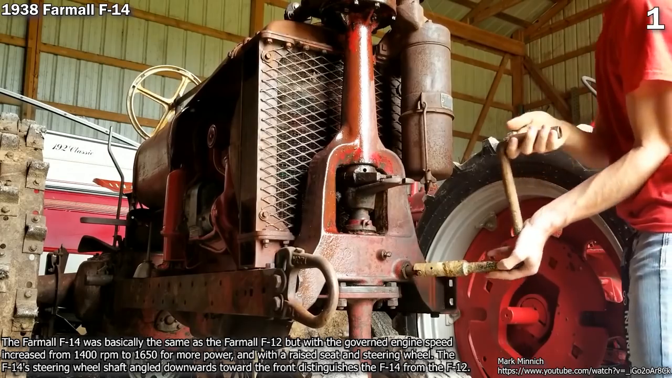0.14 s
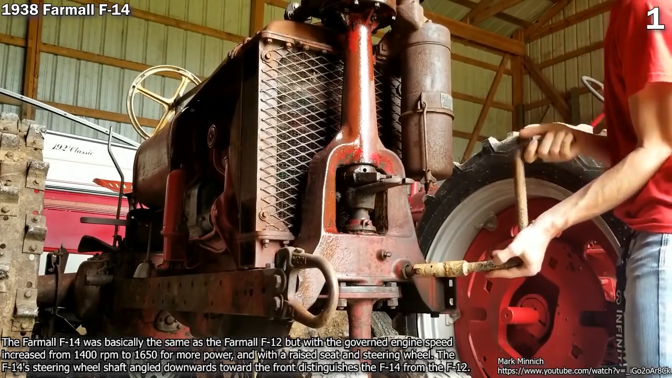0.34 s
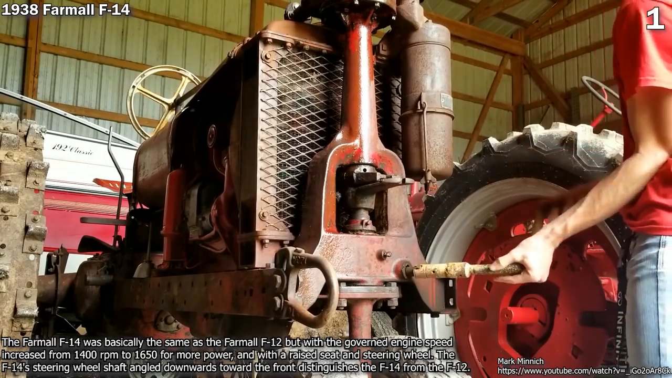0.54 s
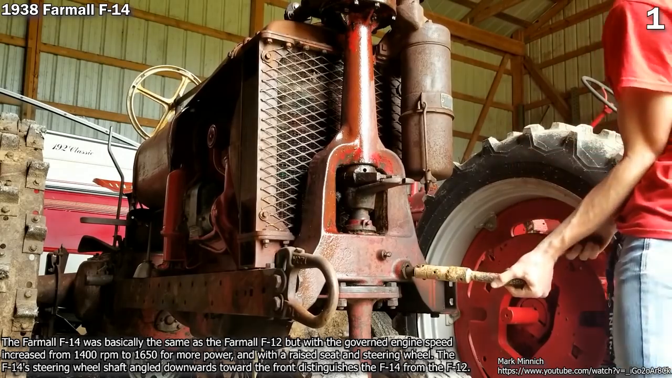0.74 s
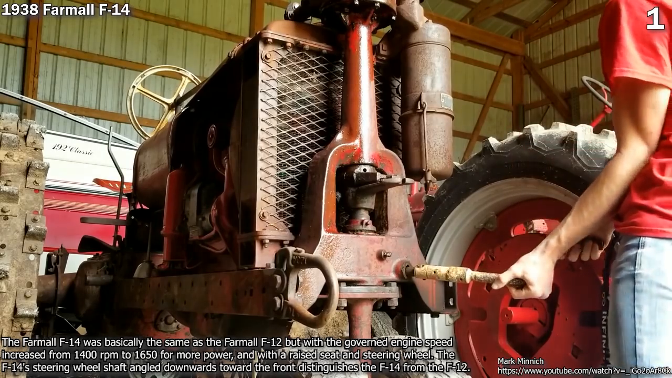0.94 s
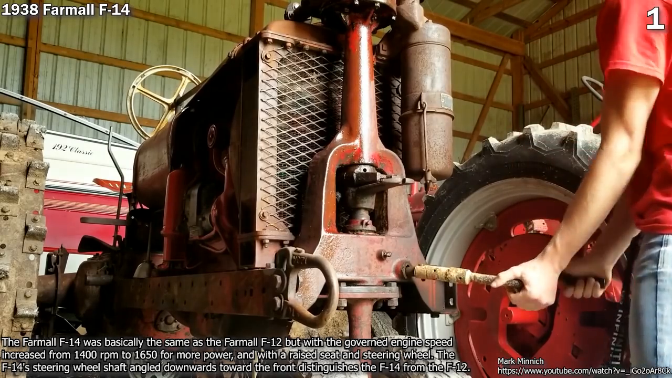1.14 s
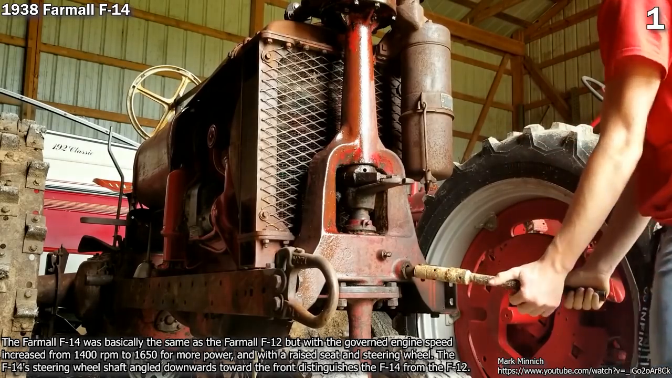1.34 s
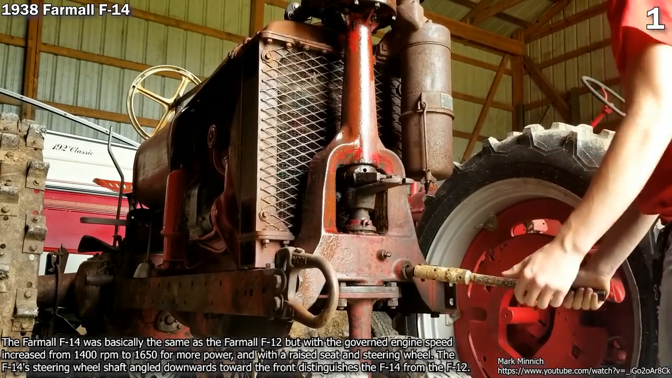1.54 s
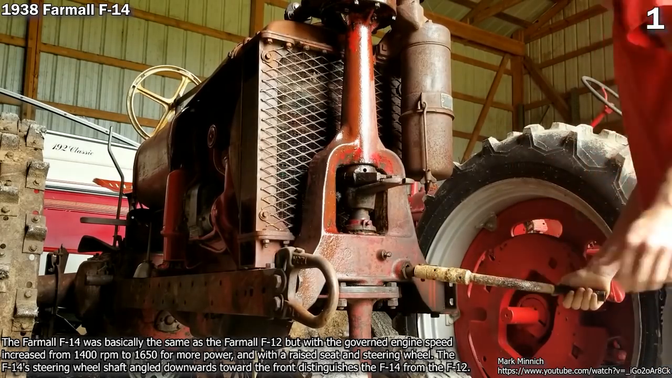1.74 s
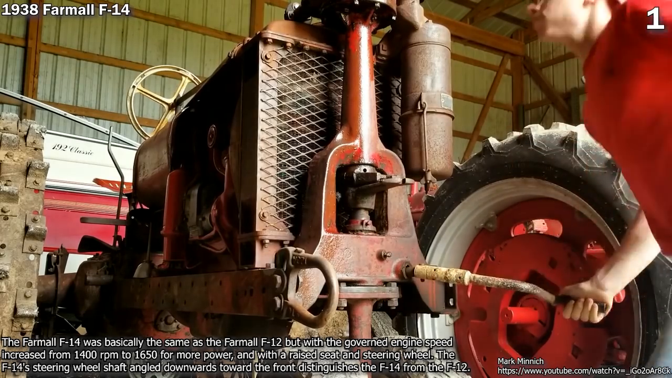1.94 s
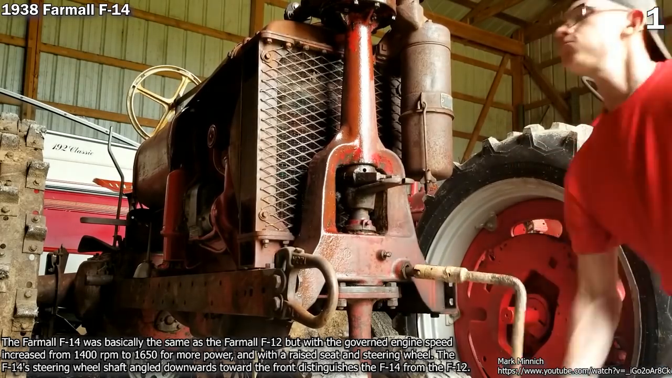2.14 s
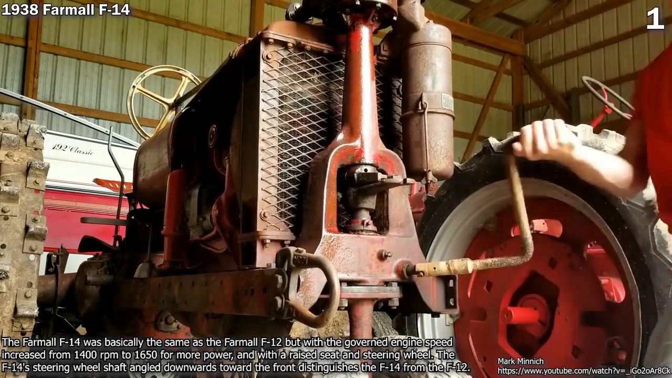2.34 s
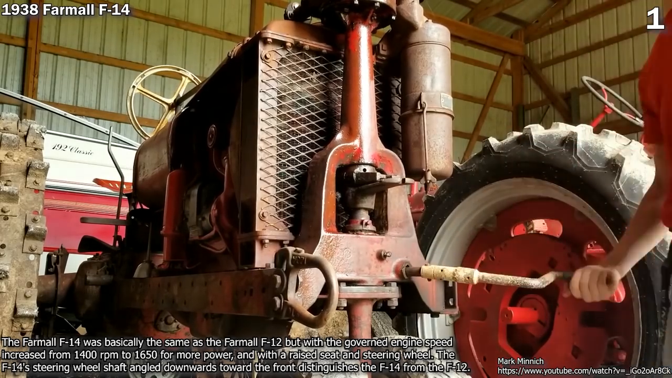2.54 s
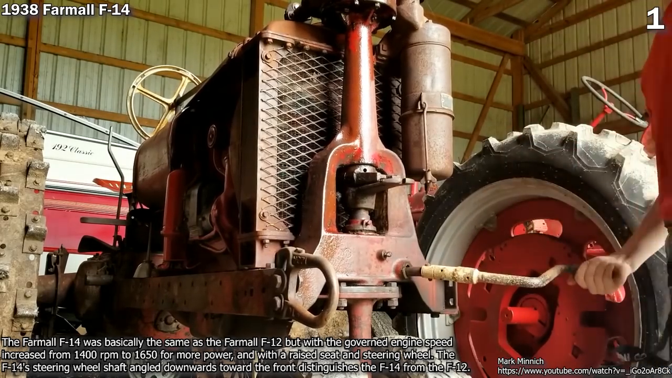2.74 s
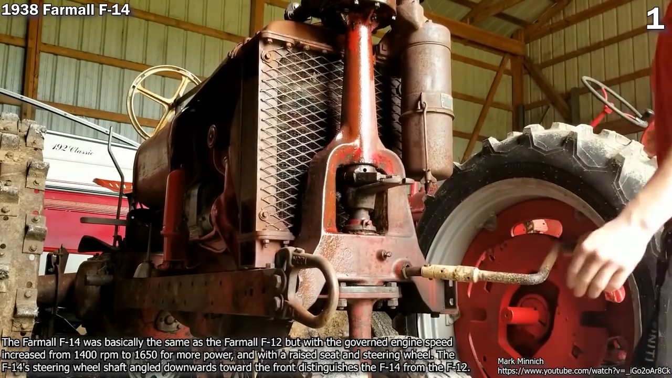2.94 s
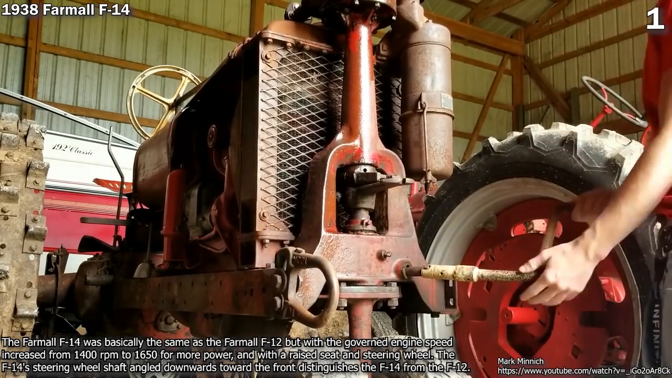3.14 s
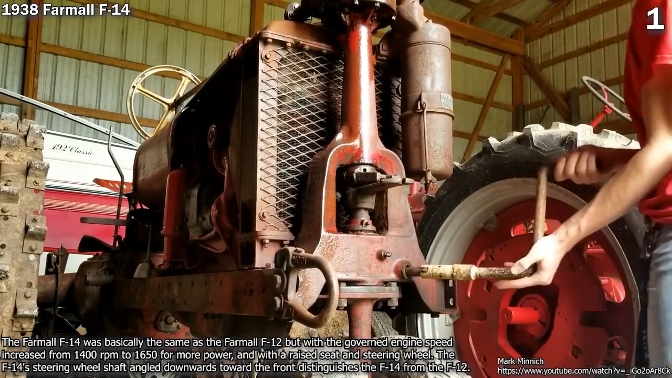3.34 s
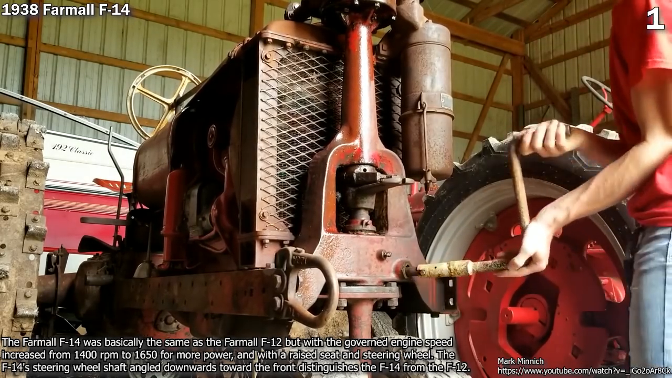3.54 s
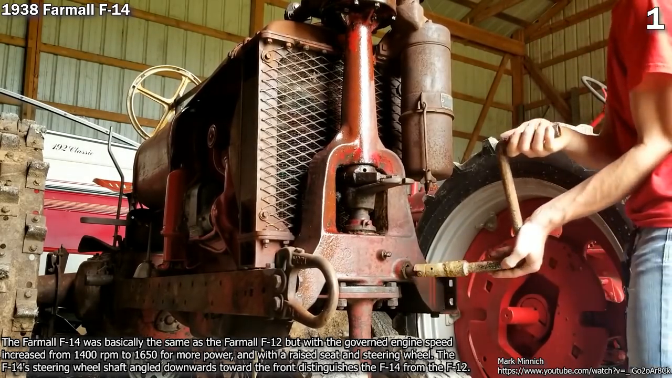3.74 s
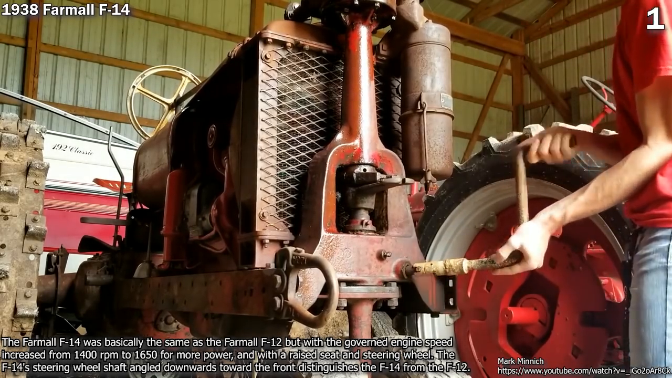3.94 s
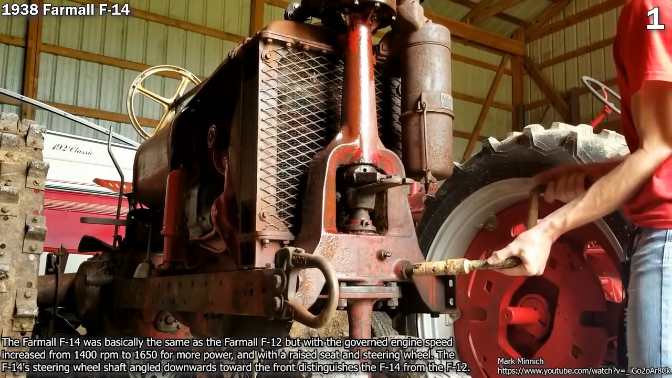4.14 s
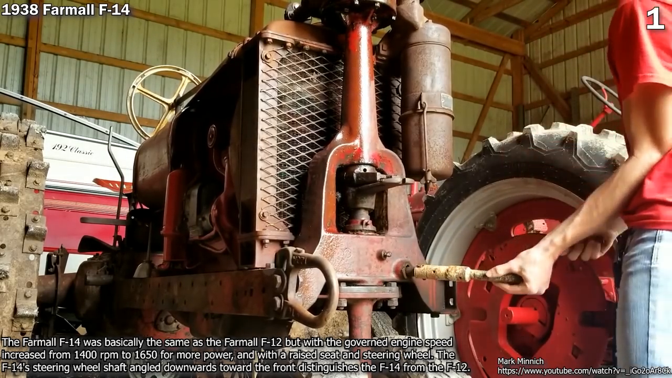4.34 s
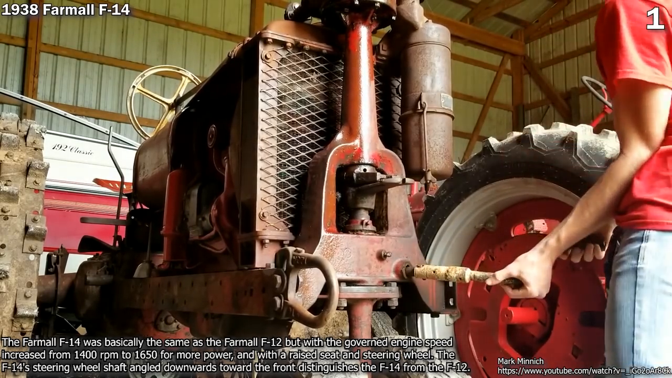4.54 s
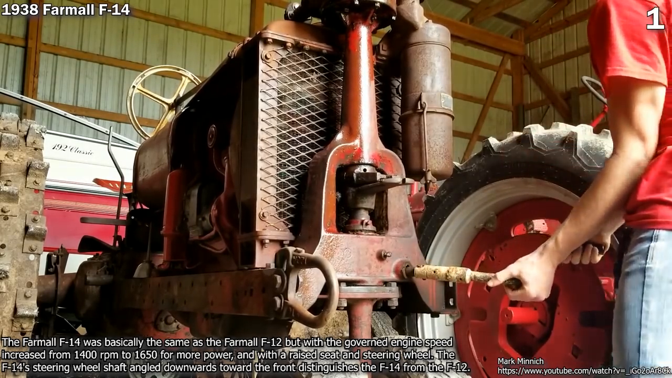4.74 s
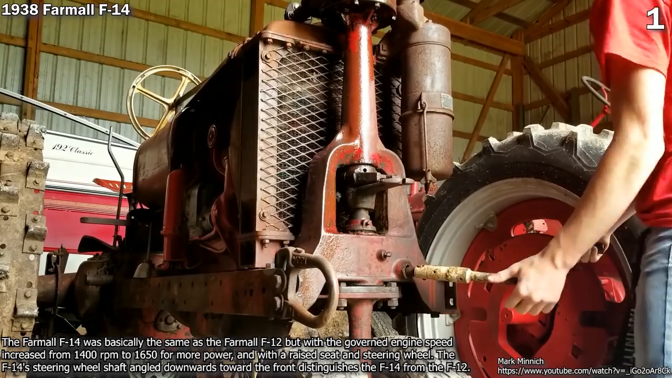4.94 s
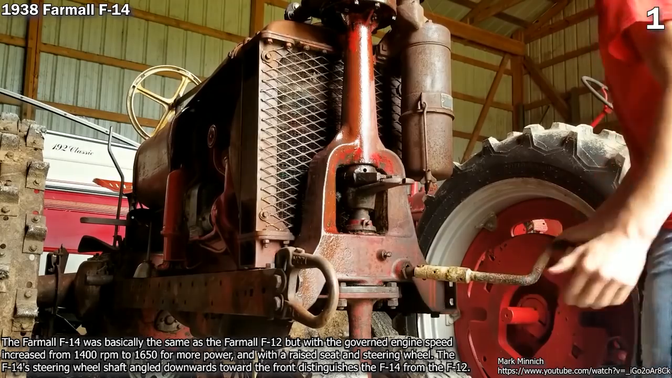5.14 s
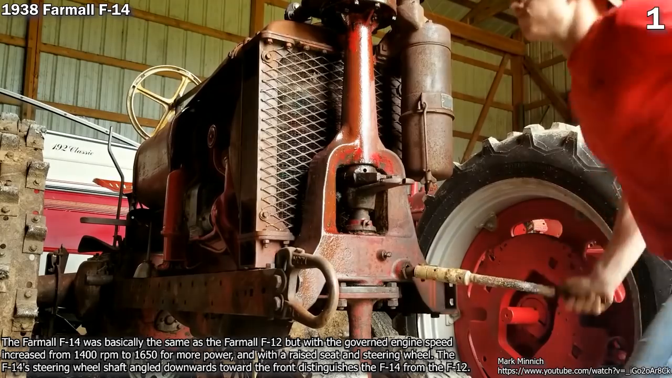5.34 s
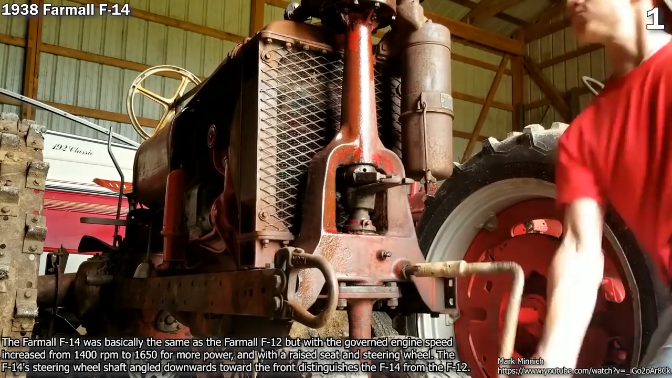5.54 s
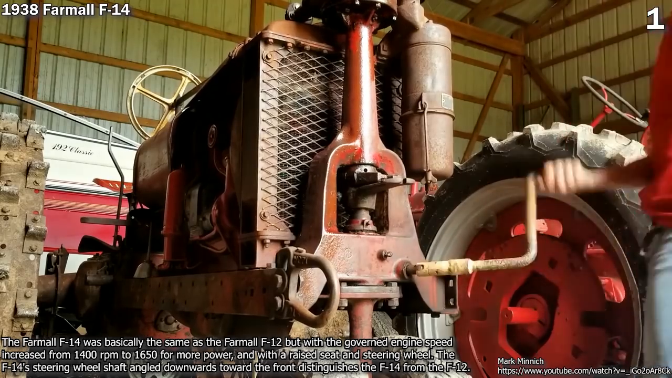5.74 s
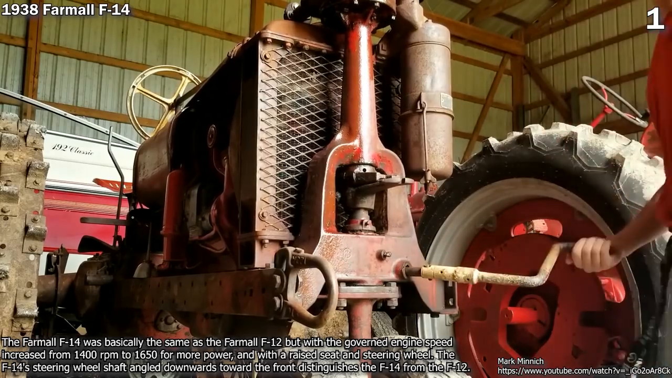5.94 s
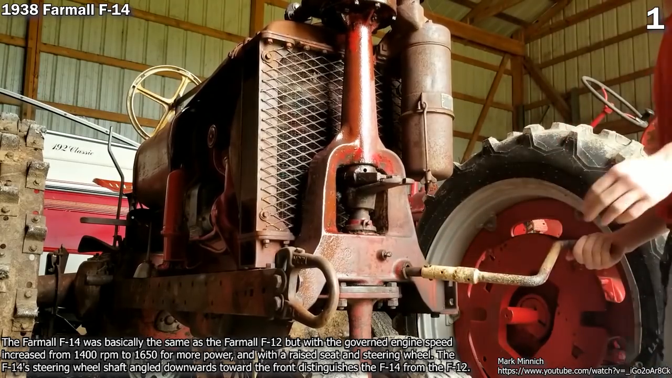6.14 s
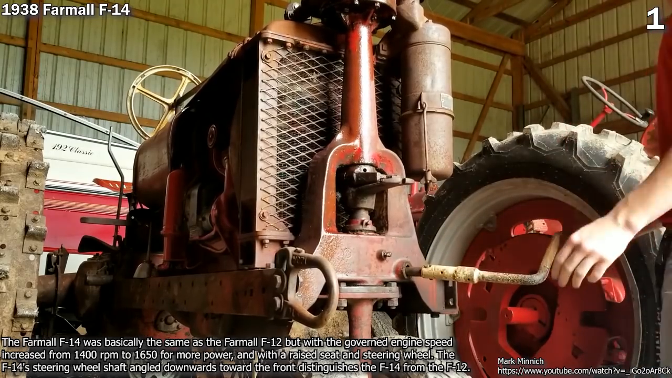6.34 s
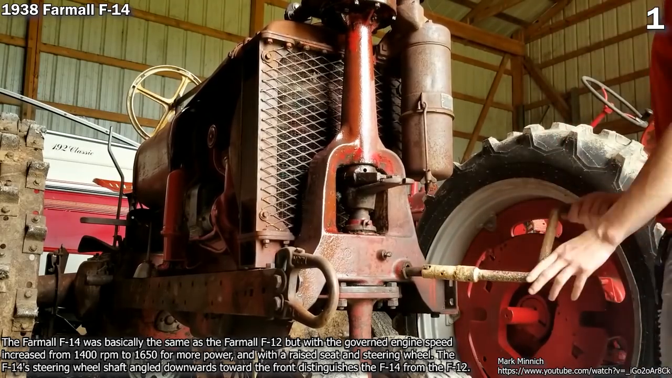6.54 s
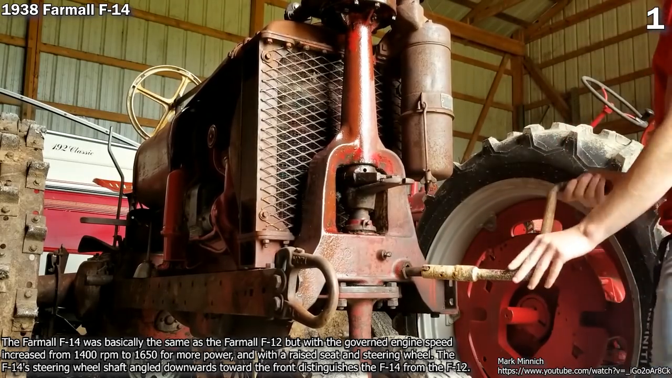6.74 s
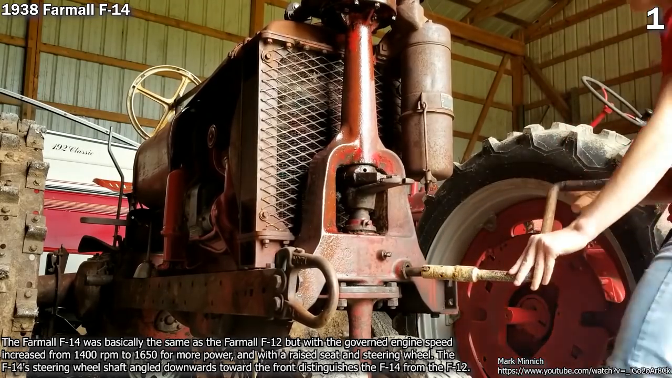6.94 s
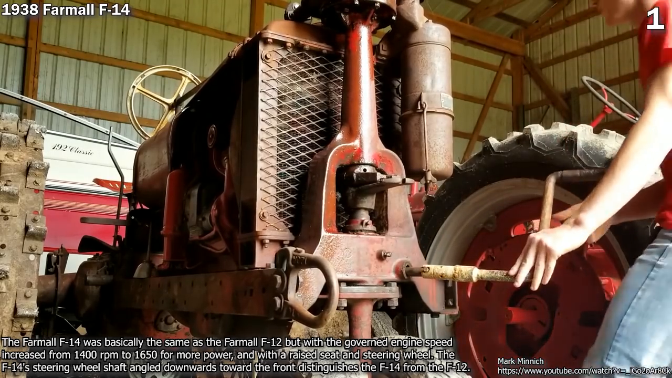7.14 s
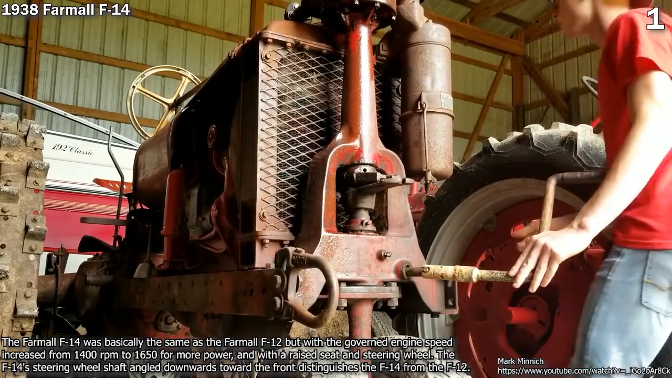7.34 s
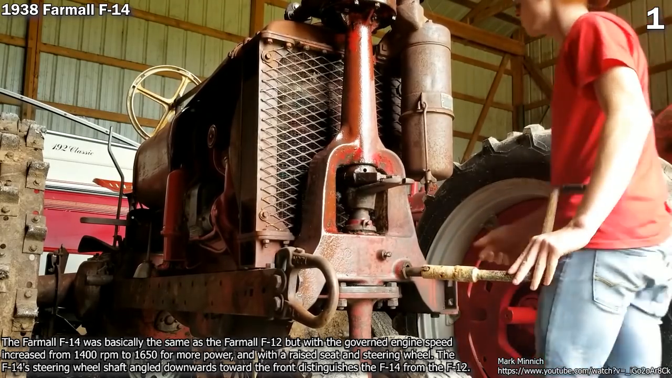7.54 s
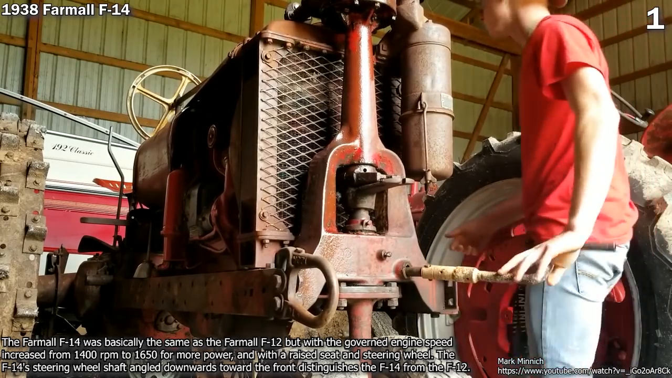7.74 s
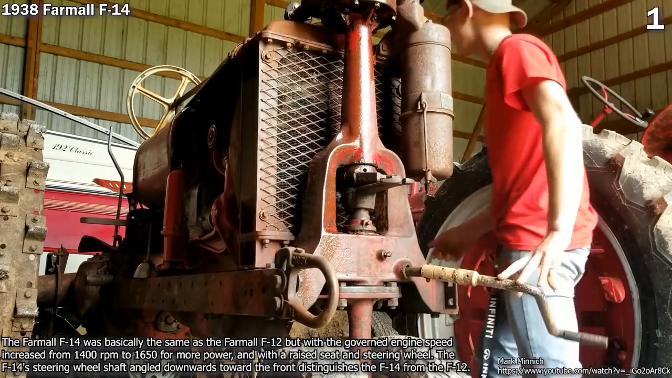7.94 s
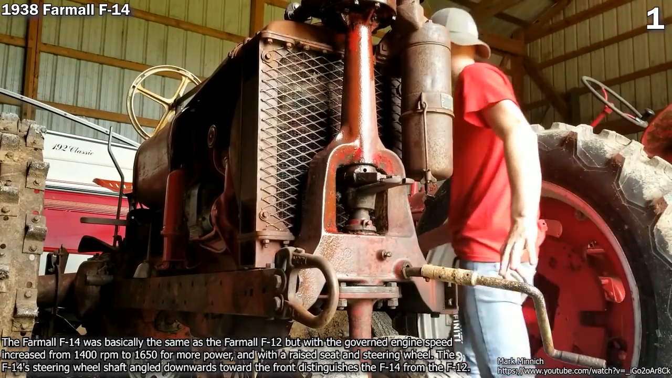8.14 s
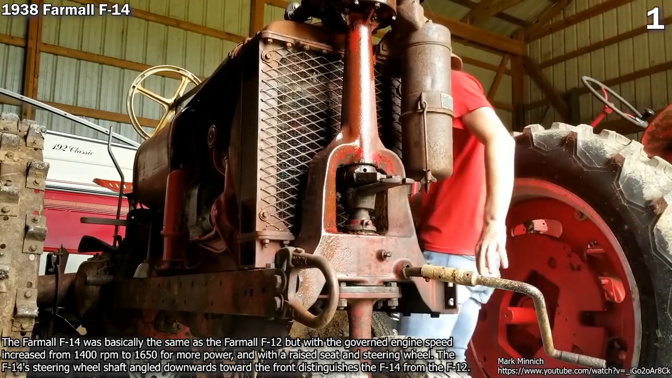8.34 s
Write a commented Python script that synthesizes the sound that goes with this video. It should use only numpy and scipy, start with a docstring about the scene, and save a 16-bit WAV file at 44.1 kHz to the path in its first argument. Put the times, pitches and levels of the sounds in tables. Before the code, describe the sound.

An old tractor is hand-cranked twice in a metal barn, giving bursts of hard steel clacks and rattles without starting.

```python
"""In a metal barn, an old tractor is hand-cranked twice and does not start.
Each pull turns the gears over and sets off a run of hard steel clacks and rattles. Between pulls the loose
crank knocks in its sleeve and creaks by stick-slip friction, and boots and clothes scuff. The tractor's
frame colours these sounds and the tin walls reverberate. Small birds chirp faintly over the distant
rumble of traffic and the drone of a motor."""
import sys
import numpy as np
from scipy import signal
from scipy.fft import rfft, irfft, next_fast_len
from scipy.io import wavfile
from scipy.ndimage import uniform_filter1d, map_coordinates

SR = 44100
rng = np.random.default_rng(int(sys.argv[2]) if len(sys.argv) > 2 else 0)


def wav_record(signal):
    """Record a signal, one row per channel, as 16-bit PCM in the file named by sys.argv[1]."""
    frames = np.transpose(np.atleast_2d(signal))
    bounded = np.clip(frames, -1, 1)
    # unit amplitude maps onto the largest positive 16-bit level
    quanta = np.round(bounded * 32767).astype(np.int16)
    wavfile.write(sys.argv[1], SR, quanta)


N = 374844


def amp(db):
    """Decibels to amplitude ratio."""
    return 10 ** (np.asarray(db) / 20)


def unit(x):
    """Normalisation to rms 1."""
    return x / np.sqrt(np.mean(x ** 2) + 1e-20)


def along(points, hz):
    """Interpolation of (frequency [Hz], value) points on a logarithmic frequency axis."""
    freqs, values = np.transpose(points)
    return np.interp(np.log(hz + 1), np.log(freqs + 1), values)


def curves(rows):
    """Linear interpolation in time: one value per sample for each column after the first."""
    times, *columns = np.transpose(rows)
    return [np.interp(np.arange(N) / SR, times, column) for column in columns]


def wobble(rate):
    """Smooth random modulation: a spline through rate knots a second."""
    return map_coordinates(rng.standard_normal(int(N * rate / SR) + 4), [np.arange(N) * rate / SR])


def roughness(size, depth_db, grain_samples):
    """Log-normal amplitude modulation, the unevenness of many tiny contacts."""
    grains = unit(uniform_filter1d(rng.standard_normal(size), size=grain_samples))
    return unit(amp(depth_db * grains))


def filtered(x, response):
    """Linear filtering: the spectrum of x times a frequency response."""
    n = x.shape[-1]
    padded = next_fast_len(n + SR // 10)
    return irfft(rfft(x, padded) * response(np.fft.rfftfreq(padded, 1 / SR)), padded)[..., :n]


def noise(spectrum, size, lo_hz=10, hi_hz=20000):
    """Spectrally shaped noise of rms 1 between two soft band edges."""
    edges = lambda hz: ((1 + (lo_hz / (hz + 1)) ** 8) * (1 + (hz / hi_hz) ** 8)) ** -.5
    return unit(filtered(rng.standard_normal(size), lambda hz: amp(along(spectrum, hz)) * edges(hz)))


def burst(t, rise, t60):
    """Linear attack over rise seconds, then exponential decay of 60 dB in t60 seconds."""
    return np.minimum(t / rise, 1) * np.exp(-np.log(1000) * np.maximum(t - rise, 0) / t60)


def ringing(modes, t):
    """Free vibration: a sum of damped modes, with new strengths and phases at every blow."""
    return sum(amp(db + rng.normal(0, 2)) * burst(t, .003, t60)
               * np.sin(2 * np.pi * (hz * t + rng.random())) for hz, db, t60 in modes)


def add(track, s, x):
    """Superposition of x on the track at s seconds."""
    i = max(round(s * SR), 0)
    track[..., i:i + x.shape[-1]] += x[..., :max(N - i, 0)]


# reverberation of the barn: (frequency [Hz], decay time T60 [s])
BARN_DECAY = [(100, 0.18), (300, 1.37), (700, 0.82), (1500, 0.77), (4000, 0.74), (7000, 0.63),
              (13000, 0.52)]
def barn(x, panel_db, tail_db, left_db=0, left_lag_samples=4):
    """Reverberation: direct sound, early reflections off the tractor's panels, then the tin walls' tail."""
    hz, t, spectra = signal.stft(rng.standard_normal((2, SR * 5 // 4)), SR, nperseg=256)
    decay = np.exp(-np.log(1000) * t / along(BARN_DECAY, hz)[:, None])
    build_up = 1 - np.exp(-t / .009)
    tail = signal.istft(spectra * decay * build_up, SR, nperseg=256)[1]
    panels = rng.standard_normal(tail.shape) * burst(np.arange(tail.shape[1]) / SR, .0004, .025)
    panels = filtered(panels, lambda f: f ** 2 / np.hypot(f ** 2, 280 ** 2))  # long waves diffract past
    mid, side = sum(amp(db) * h / np.linalg.norm(h[0]) for db, h in [(panel_db, panels), (tail_db, tail)])
    side = filtered(side, lambda f: f / np.hypot(f, 420))  # long waves reach both sides alike
    response = np.array([mid + side, mid - side]) / np.sqrt(2)
    echo = signal.fftconvolve(x[None], response, axes=1)[:, :len(x)]
    delayed = np.pad(x, (left_lag_samples, 0))[:len(x)]
    return np.array([delayed * amp(left_db / 2), x * amp(-left_db / 2)]) + echo


# spectrum of the outdoor air: (frequency [Hz], relative spectral density [dB])
AIR_SPECTRUM = [(20, -16), (40, -14.5), (60, -5.5), (110, -3.5), (170, -15.5), (300, -21.5), (600, -22),
                (1200, -24), (3000, -27), (6000, -33), (15000, -32)]
# background rumble, ducked by the recorder's gain control after loud clacks and slowly recovering:
# (time [s], level [dB])
RUMBLE_LEVELS = [(0, -54), (2.3, -60), (2.75, -67), (3.2, -63.5), (4.8, -60), (5.6, -56), (6.1, -64.5),
                 (7.2, -65), (8.5, -54.5)]
# a far motor: (time [s], frequency [Hz], level re rumble [dB])
MOTOR_HUM = [(0, 71.6, 0), (.7, 68.5, 4), (2.2, 68.74, 3.5), (4.4, 62.7, -5.5), (8.5, 57.5, -2.5)]
def outside():
    """Ambient noise: low-frequency traffic rumble and a motor's drifting tone under broadband air."""
    rumble_db, = curves(RUMBLE_LEVELS)
    hum_hz, hum_db = curves(MOTOR_HUM)
    traffic = amp(.5) * noise(AIR_SPECTRUM, N, hi_hz=275)
    spread = amp(-11) * noise(AIR_SPECTRUM, (2, N), hi_hz=300)
    hum = amp(hum_db + .82 * wobble(4.7)) * np.sin(2 * np.pi * np.cumsum(hum_hz + wobble(15)) / SR)
    air = amp(-69) * noise(AIR_SPECTRUM, (2, N), 64) + amp(-83.5) * noise(AIR_SPECTRUM, N, 210)
    return amp(rumble_db) * (traffic + spread + hum) + air


# spectra of dull contact and of light friction: (frequency [Hz], relative spectral density [dB])
CONTACT_SPECTRUM = [(59, -42), (100, 11.5), (241, -5), (733, 5.5), (1560, -11.5), (2180, -19.5),
                    (3680, -24.5), (7510, -26), (8700, -57), (12200, -35), (15000, -28)]
SCUFF_SPECTRUM = [(500, 1.5), (1200, 2), (2500, 3), (5000, -5.5), (7500, -2), (9500, -26.5), (13000, -2),
                  (15000, -20.5)]
# shifts of grip or stance: (centre time [s], half length [s], rubbing level [dB], cloth level [dB])
BODY_MOVES = [(0, 0.029, -41.5, -87), (0.6, 0.15, -58.5, -70), (1.252, 0.15, -58, -71),
              (3.427, 0.068, -38, -78), (3.998, 0.45, -59, -71.5), (6.903, 0.12, -60.5, -70),
              (7.485, 0.24, -62, -65), (8.254, 0.12, -59, -59)]
def shuffle():
    """Friction noise: uneven rubbing and the swish of clothes swell and fade as the man moves."""
    t = np.arange(N) / SR
    rub_envelope, swish_envelope = np.zeros(N), np.zeros(N)
    for s, half_length, rub_db, swish_db in BODY_MOVES:
        swell = np.exp(-((t - s) / half_length) ** 2)
        rub_envelope += amp(rub_db) * swell
        swish_envelope += amp(swish_db) * swell
    rub = noise(CONTACT_SPECTRUM, N, 340) * unit(amp(4.5 * wobble(28) + 1.2 * wobble(200)))
    swish = noise(SCUFF_SPECTRUM, N) * unit(amp(3 * wobble(25) + 2 * wobble(300)))
    return barn(amp(-5) * rub_envelope * rub + swish_envelope * swish, panel_db=-6, tail_db=1)


# modes of the crank and its sleeve: (frequency [Hz], level [dB], decay time T60 [s])
CRANK_MODES = [(370, -8, .16), (490, -3, .16), (640, 1, .16), (810, -5, .12), (1290, -7, .16),
               (1450, -15, .14), (2150, -10, .06)]
HOLLOW_HZ = 733  # the mid-range peak of the contact spectrum
def contact(thud_db, edge_db, hollow_db=0, ring_db=-120, hollow_hz=HOLLOW_HZ):
    """Impact excitation: a chattering low thud, hollow middle and bright edge, plus the crank's modes."""
    t = np.arange(SR // 3) / SR
    shifted_spectrum = np.array(CONTACT_SPECTRUM) * [hollow_hz / HOLLOW_HZ, 1]
    thud = amp(thud_db) * noise(CONTACT_SPECTRUM, len(t), 260, 480) * burst(t, .011, .19)
    edge = amp(edge_db) * noise(CONTACT_SPECTRUM, len(t), 2700, 15000) * burst(t, .0012, .18)
    hollow = amp(hollow_db) * noise(shifted_spectrum, len(t), .7 * hollow_hz, 2400) * burst(t, .006, .105)
    chatter = roughness(len(t), depth_db=2, grain_samples=90)
    return amp(-11) * (chatter * (thud + hollow + edge) + amp(ring_db) * ringing(CRANK_MODES, t))


# spectrum of the crank bar's dry clink: (frequency [Hz], relative spectral density [dB])
CLINK_SPECTRUM = [(700, -12.5), (1100, -3.5), (1600, -6.5), (2150, 1), (2600, -5.5), (3300, -13),
                  (4000, -14), (5500, -22), (8000, -37)]
def clink(t, count=4, spacing_s=.0035, loss_db=3.5):
    """Inelastic bouncing: the bar lands in quick, uneven clicks, losing energy at each."""
    gaps = spacing_s * rng.uniform(.5, 1.5, count)
    bounces = sum(amp(-loss_db * k) * burst(np.maximum(t - delay, 0), .002, .031)
                  for k, delay in enumerate(np.cumsum(gaps) - gaps[0]))
    return bounces * noise(CLINK_SPECTRUM, len(t), 600, 7300)


# knocks of the crank: (time [s], level [dB], relative thud level [dB], relative clink level [dB])
CRANK_KNOCKS = [(.017, -42, 0.5, -7.5), (.051, -49.5, -18, 1.5), (.133, -28.5, -7, -14.5),
                (.317, -35, -20, -12), (.331, -28, -17, -22.5), (.643, -52, -6, -11),
                (.703, -34.5, -7.5, -17.5), (1.105, -38, -10.5, -19), (1.141, -37, -12, -13.5),
                (1.185, -40.5, -11.5, -7.5), (1.212, -43.5, -11, -12.5), (2.067, -25, -5, -14.5),
                (3.188, -36, -16, -2.5), (3.265, -40.5, -9, -1.5), (3.365, -31.5, -19, -15),
                (3.383, -34.5, -20, -1.5), (3.432, -33, -17, -11.5), (3.739, -27.5, -6.5, -22),
                (4.386, -36, -9, -8.5), (5.432, -26.5, -22.5, -21), (6.528, -30.5, -20, -3.5),
                (6.556, -33, -11.5, -8), (6.892, -52, -10, -9.5), (6.938, -49, -9, -15),
                (7.007, -44.5, -11, -6), (7.028, -47.5, -5, -5.5), (7.31, -34, -12, -18.5),
                (8.327, -37.5, -23, -5.5), (8.355, -47.5, -22, -3)]
def knocks(rebound_s=.032, rebound_db=-13):
    """Impact across a clearance: the loose crank strikes its sleeve, clinks and falls back once, duller."""
    out, clinks, t = np.zeros(N), np.zeros(N), np.arange(SR // 3) / SR
    for s, db, thud_db, clink_db in CRANK_KNOCKS:
        add(out, s, amp(db) * contact(thud_db, edge_db=-24, hollow_db=-.5, ring_db=-5))
        add(clinks, s, amp(db + clink_db - 1.5) * clink(t))
        add(out, s + rebound_s, amp(db + rebound_db) * contact(thud_db=3, edge_db=-24.5))
    return barn(out, panel_db=-6, tail_db=-1.5) + barn(clinks, panel_db=-6, tail_db=-4)


# scuffs of grit and hand: (time [s], level [dB], decay time T60 [s])
GRIT_SCUFFS = [(0.118, -43.5, 0.028), (.134, -38.5, 0.047), (0.319, -46, 0.011), (0.376, -56, 0.055),
               (0.561, -69, 0.49), (1.183, -61, 0.11), (2.037, -56, 0.096), (3.429, -50, 0.026),
               (3.74, -33, 0.027), (4.093, -52, 0.36), (4.183, -51, 0.37), (4.764, -63, 0.62),
               (5.404, -46, 0.06), (5.434, -34.5, 0.032), (5.481, -46, 0.22), (6.387, -44.5, 0.28),
               (6.777, -52.5, 0.019), (6.871, -55, .04), (6.905, -50.5, 0.039), (7.277, -59.5, 0.08),
               (7.375, -58.5, 0.74), (7.939, -50, 0.042), (8.234, -53.5, 0.019), (8.33, -53, 0.035)]
def scuffs():
    """Sliding friction on rough surfaces: gritty little rubs and ticks."""
    out, t = np.zeros(N), np.arange(SR // 2) / SR
    for s, db, t60 in GRIT_SCUFFS:
        grit = roughness(len(t), depth_db=.53, grain_samples=60)
        add(out, s, amp(db) * grit * noise(SCUFF_SPECTRUM, len(t)) * burst(t, .026 * t60, t60))
    return barn(out, panel_db=3, tail_db=-2, left_db=3.5)


# boots on the floor: (time [s], level [dB], hollow frequency [Hz], relative crunch level [dB])
BOOT_STEPS = [(1.33, -39.5, 600, -15.5), (7.906, -34, 830, -9.5), (8.046, -35.5, 736, -25),
              (8.174, -41, 600, -6), (8.202, -38, 596, -2.5), (8.233, -35, 1010, -20), (8.3, -43, 810, -13)]
def footsteps():
    """Damped impact: each boot lands with a dull thud and a crunch."""
    out = np.zeros(N)
    for s, db, hollow_hz, crunch_db in BOOT_STEPS:
        add(out, s, amp(db) * contact(thud_db=-3.5, edge_db=crunch_db, hollow_hz=hollow_hz))
    return barn(out, panel_db=-6, tail_db=-1.5)


# pistons going over compression: (time [s], thump level [dB], rise in gear noise [dB])
PISTON_STROKES = [(2.27, -51, 10), (2.525, -59, 2), (5.642, -44, 14), (5.857, -58, 8)]
def load_db(t, lag_s=.0047, half_length_s=.015):
    """Gas compression: the engine's resistance to the crank peaks as each piston goes over."""
    return sum(db * np.exp(-((t - s - lag_s) / half_length_s) ** 2) for s, _, db in PISTON_STROKES)


# spectrum of the turning gears: (frequency [Hz], relative spectral density [dB])
GEAR_SPECTRUM = [(30, -32), (60, -3.5), (110, -5.5), (200, -1), (330, -2.5), (500, -4.5), (700, 2),
                 (1400, -11), (3000, -7.5), (7000, -12), (15000, -35.5)]
# pulls on the crank: (start time [s], end time [s], gear noise level [dB])
CRANK_PULLS = [(2.072, 2.661, -38.5), (5.419, 6.177, -41.5)]
def gears(spin_up_db_per_s=704, coast_db_per_s=44):
    """Meshing noise: the gears churn unevenly during a pull, labour at each compression, then coast."""
    t = np.arange(N) / SR
    pulled = sum(amp(db - spin_up_db_per_s * np.maximum(start - t, 0)
                     - coast_db_per_s * np.maximum(t - end, 0)) for start, end, db in CRANK_PULLS)
    teeth = rng.standard_normal(N) * amp(1.8 * wobble(45) + 2.5 * wobble(300))
    churn = unit(filtered(teeth, lambda hz: amp(along(GEAR_SPECTRUM, hz)) * hz / np.hypot(hz, 50)))
    low = filtered(churn, lambda hz: 1 / (1 + (hz / 1800) ** 4))
    hiss = churn - low
    # a pull starts quieter, above all in the treble: the teeth hiss only as speed builds
    starting = lambda length: sum(np.exp(-((t - start) / length) ** 2) for start, *_ in CRANK_PULLS)
    gathering = low * amp(-.5 * starting(.024)) + hiss * amp(-3.5 * starting(.049))
    return barn(pulled * amp(load_db(t)) * gathering, panel_db=1, tail_db=-6.5, left_db=1)


# modes of the struck steel: (frequency [Hz], level [dB], decay time T60 [s])
STEEL_MODES = [(507, -10, .35), (661, 1, .3), (727, 0, .3), (894, -5, .25), (975, -6, .3), (1256, -5, .25),
               (1444, -6, .35), (1730, -9, .25), (1831, -5, .3), (2168, -8, .2), (2423, -6, .3),
               (3966, -10, .25), (4971, -7, .35), (6032, -8, .3), (6154, -8, .3), (12606, -13, .45),
               (12743, -8, .45)]
# spectrum of steel hitting steel: (frequency [Hz], relative spectral density [dB])
CLASH_SPECTRUM = [(59, -45.5), (100, -22), (541, -12.5), (700, -5), (900, -9.5), (1200, -11), (1500, -11),
                  (1850, -3.5), (3610, -2), (6000, -1.5), (7890, -7.5), (8770, -24.5), (13100, -23.5),
                  (14500, -31), (15500, -34)]
# clacks of crank and engine:
# (time [s], level [dB], body re clash [dB], sizzle re clash [dB], clash decay time T60 [s])
STEEL_CLACKS = [(2.125, -14, -8, -1.5, 0.024), (2.275, -12.5, -6, -5.5, 0.18),
                (2.398, -13.5, -12, -4, 0.041), (2.528, -12, -4, -3, 0.065),
                (2.611, -14.5, -6.5, -1.5, 0.053), (2.851, -6, -7.5, -4.5, 0.015),
                (5.503, -14, -4.5, 0, 0.052), (5.645, -11.5, -4, -6.5, 0.14),
                (5.747, -11.5, -9, -2.5, 0.032), (5.861, -12.5, -3.5, -7, 0.099),
                (5.928, -13, -5, -2, 0.057), (6.07, -9.5, -3.5, -4, 0.019), (6.21, -22.5, -13, -3.5, 0.049)]
def clacks():
    """Hard impact: a crush of tiny contacts radiates broadband noise and excites the steel's modes."""
    out, t = np.zeros((2, N)), np.arange(SR // 2) / SR
    low_cut = signal.butter(3, 360, 'high', fs=SR, output='sos')  # small parts radiate little bass
    for s, db, body_db, sizzle_db, t60 in STEEL_CLACKS:
        chatter = roughness(len(t), depth_db=2.5, grain_samples=20)
        clash = noise(CLASH_SPECTRUM, len(t), 1300, 6300) * burst(t, .0029, t60)
        sizzle = amp(sizzle_db) * noise(CLASH_SPECTRUM, len(t), 12000) * burst(t, .00036, 1.99 * t60)
        body = amp(body_db) * noise(CLASH_SPECTRUM, len(t), 330, 1600) * burst(t, .005, 1.69 * t60)
        ring = amp(body_db - 18) * ringing(STEEL_MODES, t)
        blow = amp(db - 5) * (chatter * (clash + sizzle + body) + ring)
        radiated = signal.sosfilt(low_cut, np.pad(blow, (0, SR)))
        # each clack gets a fresh random reverberation, so no steady tones build up
        add(out, s, barn(radiated, panel_db=0, tail_db=-2))
        # steel grazes steel just before it lands
        graze = noise(CLASH_SPECTRUM, (2, len(t)), 1800) * burst(t, .0041, .1)
        add(out, s - .003, amp(db - 8.5) * graze)
    return out


# loose parts rattling among the clacks: (time [s], level [dB], body re tick [dB])
LOOSE_RATTLES = [(2.148, -25, -7.5), (2.223, -32.5, 5), (2.251, -23.5, -14), (2.292, -22.5, -5.5),
                 (2.309, -21, -3), (2.54, -19.5, -0.5), (2.652, -26, -2.5), (2.821, -35, -8.5),
                 (5.598, -24, -13), (5.613, -20.5, -8.5), (5.626, -23, -5.5), (5.663, -17.5, -0.5),
                 (5.677, -15, -11), (5.755, -20, -6.5), (5.873, -18.5, -2.5), (5.943, -24.5, -22),
                 (6.087, -27, -4), (6.228, -17.5, -5.5), (6.241, -32.5, -2)]
def rattles(t60=.025):
    """Heavily damped impacts: loose pins and rods each give one short, dry tick."""
    out, t = np.zeros(N), np.arange(SR // 8) / SR
    for s, db, body_db in LOOSE_RATTLES:
        tick = noise(CLASH_SPECTRUM, len(t), 1500, 8000) * burst(t, .0008, t60)
        body = amp(body_db) * noise(CLASH_SPECTRUM, len(t), 400, 2000) * burst(t, .002, 2 * t60)
        add(out, s, amp(db - 2.5) * (tick + body))
    return barn(out, panel_db=-3, tail_db=-5)


# resonances of the dog, the crank's sliding catch: (frequency [Hz], half width [Hz], level [dB])
DOG_RESONANCES = [(6150, 120, -16), (7830, 70, -9), (12606, 22, -3), (12745, 22, 4), (12800, 400, -18)]
# the dog slides back in as the crank is reset: (time [s], level [dB])
DOG_RESETS = [(3.33, -50), (6.522, -44.5)]
def scrapes(lead_s=.025):
    """Friction-excited resonance: the dog sings as it climbs its ramp before a clack or slides back in."""
    out, t = np.zeros(N), np.arange(SR // 3) / SR
    response = lambda f: sum(amp(db) / (1 + ((f - hz) / width) ** 2) for hz, width, db in DOG_RESONANCES)
    # louder under load; at a pull's first clack the dog is still seated
    climbs = [(s - lead_s, -41 + 1.5 * load_db(s)) for s, *_ in STEEL_CLACKS
              if all(abs(s - start) > .12 for start, *_ in CRANK_PULLS)]
    for s, db in climbs + list(DOG_RESETS):
        singing = unit(filtered(rng.standard_normal(len(t)), response))
        add(out, s, amp(db) * singing * burst(t, .012, .22))
    return barn(out, panel_db=-8, tail_db=-2, left_db=2)


def thumps():
    """Structure-borne sound: each compression rocks the tractor, a soft push through frame and tyres."""
    out, t = np.zeros(N), np.arange(SR // 2) / SR
    for s, db, _ in PISTON_STROKES:
        add(out, s, amp(db) * noise(AIR_SPECTRUM, len(t), 40, 110) * burst(t, .037, .69))
    return out


def groan(start_s=3.57, length_s=.097, start_hz=190, end_hz=172, db=-48):
    """Friction-induced vibration: the dry shaft gives a brief, falling tone before it starts to slip."""
    out, progress = np.zeros(N), np.linspace(0, 1, int(length_s * SR))
    hz = start_hz + (end_hz - start_hz) * progress
    add(out, start_s, amp(db) * np.sin(np.pi * progress) * np.sin(2 * np.pi * np.cumsum(hz) / SR))
    return barn(out, panel_db=-14, tail_db=-9)


# spectrum of the shaft slipping in its sleeve: (frequency [Hz], relative spectral density [dB])
SLEEVE_SPECTRUM = [(120, -48.5), (200, 13), (800, 13.5), (1490, 13), (1720, 19.5), (2250, -1), (2650, 14.5),
                   (3400, 12.5), (4720, 11.5), (7690, 5.5), (8410, -2), (9500, -61), (11600, 1.5),
                   (15000, -16)]
def creak(start_s=3.654, slip_hz=104, count=9, rise_s=.026, swell_db_per_s=480, fade_db_per_s=120):
    """Stick-slip friction: the shaft gives a nearly periodic train of gritty slips that swells and eases."""
    out, t = np.zeros(N), np.arange(SR // 10) / SR
    for s in np.arange(count) / slip_hz:
        db = -28 - max(swell_db_per_s * (rise_s - s), fade_db_per_s * (s - rise_s))
        grit = noise(SLEEVE_SPECTRUM, len(t))
        slip = grit * burst(t, rng.uniform(.0015, .0035), rng.uniform(.026, .044))
        add(out, start_s + s + rng.normal(0, .0008), amp(db + rng.normal(0, 1.2)) * slip)
    return barn(out, panel_db=-9, tail_db=-5.5, left_db=1, left_lag_samples=1)


# bird calls: (time [s], length [s], centre frequency [Hz], relative fall in pitch [1/s],
# level [dB], rasp [fraction of the pitch])
BIRD_CALLS = [(4.543, .02, 3860, 2, -57.5, .024), (4.61, .025, 3880, .3, -62, .013),
              (4.688, .022, 3880, .3, -66, .013), (4.64, .28, 2640, .7, -68, .04),
              (4.855, .04, 6200, -1.2, -57.5, .025), (4.93, .035, 6280, 0, -62, .016),
              (5.05, .08, 1940, .2, -67, .035), (5.129, .11, 1310, .69, -72, .04),
              (5.162, .068, 2870, -1.2, -57, .018), (5.228, .022, 2790, 2.5, -56, .024),
              (5.266, .028, 2780, -2.2, -57.5, .028), (5.32, .02, 2780, 2, -59.5, .024),
              (7.045, .04, 2900, .9, -65, .04), (7.07, .2, 2600, .9, -66, .06),
              (7.65, .09, 3060, .3, -64.5, .055), (7.7, .4, 2680, .4, -65, .08)]
def birds(twitter_hz=21, twitter_depth=.35):
    """Frequency and amplitude modulation: thin calls glide and twitter, heard partly by way of the roof."""
    out = np.zeros(N)
    waver = .4 * wobble(70) + wobble(700)
    flutter = unit(amp(1.5 * wobble(40)))
    for s, length, middle_hz, fall, db, rasp in BIRD_CALLS:
        t = np.arange(int(length * SR)) / SR
        from_middle = t - length / 2
        hz = middle_hz * (1 - fall * from_middle + rasp * waver[int(s * SR):][:len(t)])
        arch = np.sqrt(np.abs(np.sin(np.pi * t / length)))
        syllables = 1 - twitter_depth * np.sin(np.pi * twitter_hz * from_middle) ** 2
        add(out, s, amp(db) * arch * syllables * np.sin(2 * np.pi * np.cumsum(hz) / SR))
    return barn(out * flutter, panel_db=-9, tail_db=-1.5)


# resonances of hood, radiator and cast frame: (frequency [Hz], bandwidth [Hz], boost or cut [dB])
FRAME_RESONANCES = [(190, 110, 5), (390, 78, 3), (501, 10, 3), (642.4, 21, 2), (740, 100, 2), (907, 27, 5),
                    (1000, 50, 2.5), (1200, 120, 3.5), (1506, 20, -2), (1840, 24, 2), (2050, 46, -2),
                    (2170, 110, 2), (2460, 34, 0.5), (3050, 120, 2.5), (3420, 33, 3.5), (3990, 190, 3.5),
                    (4500, 190, 2), (4847, 90, 5), (5850, 130, 2.5), (6040, 160, 2.5), (7000, 140, 1.5)]
def frame(hz):
    """Forced response: the tractor's body passes everything, with a peak or dip at each resonance."""
    resonances = sum((amp(db) - 1) * 1j * hz * width / (centre ** 2 - hz ** 2 + 1j * hz * width)
                     for centre, width, db in FRAME_RESONANCES)
    return amp(-1.5) * (1 + resonances)


# balance of the tractor's sound: (frequency [Hz], level of left over right [dB])
LEFT_EXCESS = [(100, 7), (280, 2), (550, 4), (1100, 9), (2200, 1.5), (4500, 5.5), (8000, 3), (12500, 6.5),
               (15000, 17)]
def bearing(hz, bass_edge_hz=90):
    """Interaural level difference: the tractor is louder on the left; its deep bass rolls off."""
    balance = amp(along(LEFT_EXCESS, hz) * np.array([[.5], [-.5]]))
    return balance * hz ** 2 / np.hypot(hz ** 2, bass_edge_hz ** 2)


def scene():
    """Superposition: tractor and man, coloured by the frame, with thumps, birds and distant noise."""
    tractor = (clacks() + rattles() + scrapes() + gears() + knocks() + footsteps()
               + scuffs() + shuffle() + groan() + creak())
    return filtered(tractor, lambda hz: frame(hz) * bearing(hz)) + thumps() + birds() + outside()


def record(dry, ceiling=.95, top_hz=14750):
    """Soft saturation rounds off the highest peaks; a steep low-pass filter limits the band."""
    rounded = dry / (1 + np.abs(dry / ceiling) ** 6) ** (1 / 6)
    return filtered(rounded, lambda hz: 1 / (1 + (hz / top_hz) ** 100))


dry = scene()
out = record(dry)
wav_record(out)
```